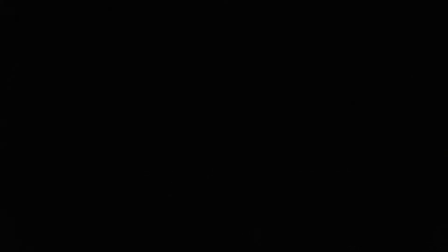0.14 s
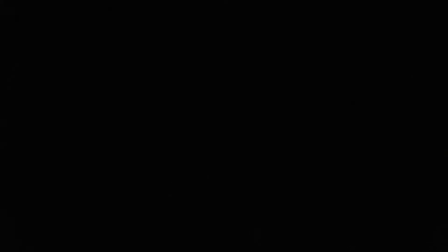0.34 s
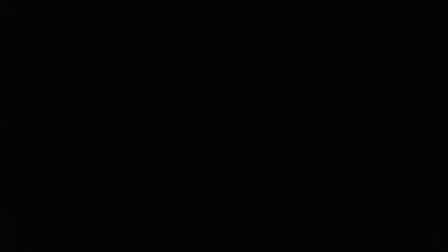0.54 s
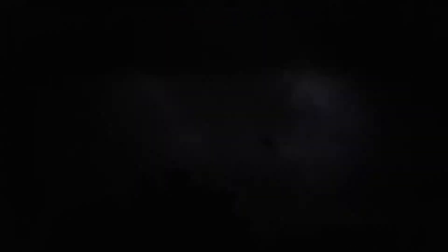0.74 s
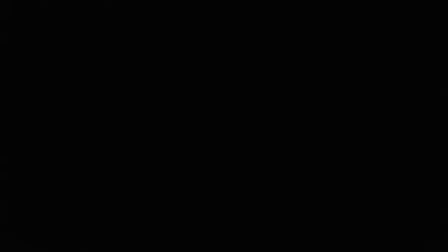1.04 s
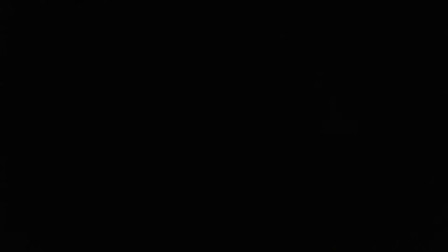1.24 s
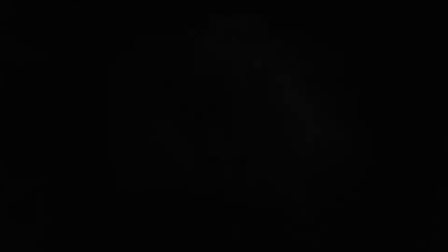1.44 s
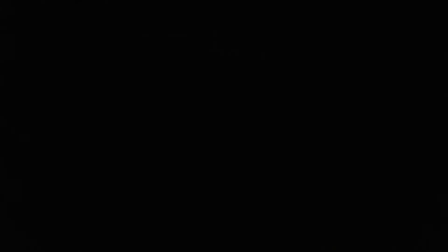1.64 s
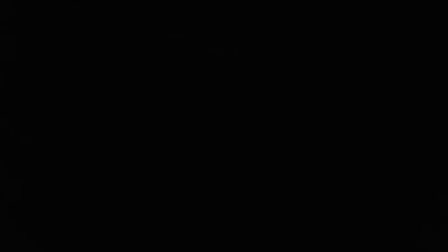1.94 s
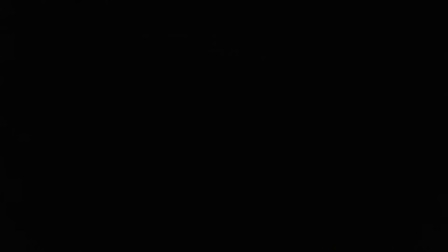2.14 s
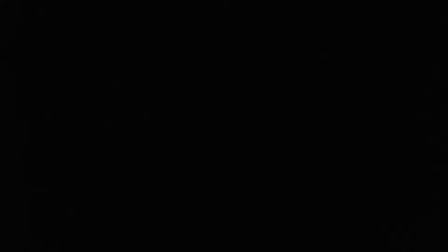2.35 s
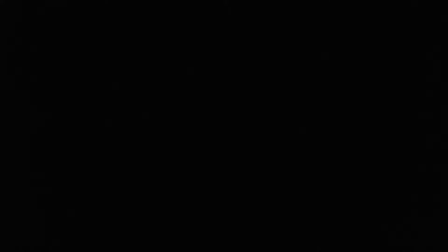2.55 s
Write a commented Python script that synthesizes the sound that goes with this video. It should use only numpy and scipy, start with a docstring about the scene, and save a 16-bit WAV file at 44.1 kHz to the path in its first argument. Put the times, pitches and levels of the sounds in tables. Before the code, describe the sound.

Distant thunder rolls on without a break, swelling into dull thumps over the thin hiss of light rain. Outdoors at night, a drop knocks on something hollow, then another ticks sharply right beside the left microphone.

```python
"""Outdoors in a night storm, far thunder rolls over the thin hiss of light rain. Many dull arrivals
superpose into the roll, and a few strong ones stand out as thumps. Drops tick on a casing beside the
left microphone, one excites the modes of something hollow and one plinks into water, amid short soft
bursts of noise. A faint swish and a rising whistle follow the knock; a higher whistle sinks at the end."""
import sys
import numpy as np
from scipy import signal
from scipy.fft import rfft, irfft
from scipy.io import wavfile
from scipy.ndimage import uniform_filter1d

SR = 44100
rng = np.random.default_rng(int(sys.argv[2]) if len(sys.argv) > 2 else 0)


def generate_wav(sig):
    """Save sig (samples, or channels by samples) to the path in sys.argv[1] as 16-bit PCM at SR."""
    pcm = np.round(np.clip(np.atleast_2d(sig).T, -1, 1) * 32767).astype(np.int16)
    wavfile.write(sys.argv[1], SR, pcm)


N = 119070
LOW_CUT_HZ, TOP_HZ = 40, 15900  # passband of the recorder


def thunder():
    """Superposition: a deep roll with a growl above it; a few strong arrivals stand out as thumps."""
    # spectra of the roll and its growl (f/Hz, relative density/dB)
    roll_spectrum = [(20, -32), (31, -39.5), (43, -6), (56, -6.5), (67, -12), (78, -16.5), (90, -6),
                     (112, -4), (127, -6), (155, -1.5), (178, -2), (192, -3), (208, 0), (235, -15.5),
                     (290, -21.5), (600, -75.5)]
    growl_spectrum = [(120, -20), (200, -23), (243, 4), (265, -6), (305, 1), (340, -2.5), (380, -2.5),
                      (425, -8.5), (460, -6.5), (490, -11), (560, -14), (750, -20.5), (1100, -34),
                      (2500, -64.5)]
    # their envelopes (t/s, level/dB)
    roll_levels = [(0, -36.5), (.2, -34.5), (.33, -38), (.42, -33.5), (.55, -31), (.72, -33.5), (.87, -34),
                   (1.12, -34), (1.27, -35.5), (1.4, -32), (1.6, -33), (1.8, -33.5), (1.98, -30),
                   (2.2, -37.5), (2.4, -32.5), (2.7, -34)]
    growl_levels = [(0, -38), (.15, -38.5), (.28, -40.5), (.5, -38.5), (.7, -38), (.85, -38), (1.15, -41),
                    (1.3, -40.5), (1.55, -39.5), (1.78, -39.5), (2.0, -39), (2.2, -41.5), (2.45, -41),
                    (2.7, -41.5)]
    # strong arrivals (t/s, f/Hz, peak level/dB, rise time/s)
    arrivals = [(.015, 315.5, -33, 0.015), (.085, 110, -32, .014), (.095, 325.4, -32, 0.012),
                (.39, 176, -28.5, 0.015), (.395, 307.5, -34, 0.011), (.495, 316, -32, 0.016),
                (.51, 208.5, -31.5, 0.016), (.565, 160.1, -31.5, 0.02), (0.796, 161.2, -25, 0.021),
                (1.006, 168.4, -21, 0.016), (1.016, 289.4, -30, 0.015), (1.304, 167, -15.5, 0.011),
                (1.305, 121.6, -23, 0.023), (1.307, 80, -32.5, 0.023), (1.47, 57, -34.5, 0.04),
                (1.595, 203, -27.5, 0.012), (1.652, 147, -27.5, 0.0076), (1.737, 176.4, -24.5, 0.015),
                (1.829, 206, -29.5, .012), (1.89, 148.6, -26, 0.019), (1.897, 79, -32, 0.02),
                (2.015, 177.5, -30.5, 0.012), (2.335, 152, -23, 0.02)]
    roll = rumble(roll_spectrum, roll_levels) + rumble(growl_spectrum, growl_levels)
    grit = undb(-24.5) * unit(colour(rng.standard_normal(N), growl_spectrum))
    thumps = sum(undb(db) * swell(s, rise) * (tone(s, hz) + grit) for s, hz, db, rise in arrivals)
    return pan(roll + thumps, db=.4)


def rumble(spectrum, levels, even_s=.09):
    """Incoherent addition: many dull arrivals merge into one even sound, wider towards the top."""
    # stereo width (f/Hz, gain of the side signal/dB)
    width = [(50, -21.5), (160, -22), (350, -16), (700, -10), (1200, 6)]
    mid = unit(colour(scatter(per_s=1800, spread_db=1), spectrum))
    running_rms = np.sqrt(uniform_filter1d(mid ** 2, int(even_s * SR)) + 1e-9)
    mid = unit(mid / running_rms)
    side = colour(unit(colour(rng.standard_normal(N), spectrum)), width)
    return curve(levels) * (mid + side * np.array([[1], [-1]]))


def ticks():
    """Impact excitation: sharp clicks close on the left. A brief faint hiss is added separately."""
    # impacts (t/s, peak level/dB, treble tilt/dB, low edge f/Hz)
    impacts = [(0.9904, -41, -26, 5000), (1.0432, -22, -22, 2600), (1.048, -33, -32, 2400),
               (1.0512, -23.5, -21, 2200), (1.057, -11, -2.5, 400)]
    clicks = sum(undb(db) * casing_click(s, tilt_db, low_hz) for s, db, tilt_db, low_hz in impacts)
    hiss_envelope = sum(undb(db - 37.5) * fade(s, decay_s=.025) for s, db, _, _ in impacts)
    added_hiss = hiss_envelope * band(hz=5760, octaves=.76)
    return pan(clicks + added_hiss, db=27)


def casing_click(start, tilt_db, low_hz, spread_s=.00082):
    """Dispersion: the highs leave the struck casing before the lows, coloured by its resonances; peak 1."""
    # broad resonances of the casing (f/Hz, relative level/dB)
    resonances = [(200, -16), (500, -0.5), (800, -1), (1400, 1), (2700, -8), (3600, -5.5), (4500, 2),
                  (5100, -6), (5600, -12), (6600, -12.5), (7400, -3), (8300, 3), (9500, 1), (10400, -16),
                  (11900, -4), (13600, -12), (14600, -11), (16000, -30)]
    hz = np.fft.rfftfreq(N, 1 / SR)
    group_delay = start + spread_s * (1 - hz / TOP_HZ)
    phase = -2 * np.pi * np.cumsum(group_delay) * SR / N
    gain = undb(tilt_db * hz / TOP_HZ) * hz ** 2 / np.hypot(hz ** 2, low_hz ** 2)
    click = colour(irfft(gain * np.exp(1j * phase), N), resonances)
    return click / np.abs(click).max()


def knocks(contact_s=.00045):
    """Damped modes: a drop pushes something hollow over a short contact time, and spatters."""
    # impacts (t/s, peak level/dB)
    impacts = [(0.3208, -27.5), (.3262, -39), (.3332, -34), (.339, -53), (.3452, -45)]
    # modes of the hollow body (f/Hz, relative level/dB, T60/s)
    modes = [(703, 2, 0.062), (816, 3.5, 0.041), (983, 4.5, 0.027), (1180, 7, 0.033), (1340, 3.5, 0.038),
             (1520, 2.5, 0.011), (2060, 9, 0.0092), (2160, -2, 0.013), (2480, -10, 0.013)]
    spatter = undb(-24) * band(hz=1350, octaves=.71)
    out = 0
    for s, db in impacts:
        t = since(s)
        ring = sum(undb(mode_db - 60 * t / t60) * tone(s, hz) for hz, mode_db, t60 in modes)
        ring *= 1 - np.exp(-(t / contact_s) ** 2)
        out += undb(db) * (ring / np.abs(ring).max() + spatter * fade(s, decay_s=.016))
    return pan(out, db=-1.5)


def plink():
    """Damped oscillation: a drop falling into water sounds one brief tone."""
    # the drop (t/s, f/Hz, peak level/dB, rise time/s)
    drops = [(0.682, 1203, -43, 0.0021)]
    return sum(undb(db) * swell(s, rise) * tone(s, hz) for s, hz, db, rise in drops)


def soft_bursts(rise_s=.003):
    """Exponential decay: short soft bursts of noise, and a faint longer swish after the knock."""
    # bursts (t/s, level/dB, centre f/Hz, decay time/s, pan/dB)
    bursts = [(.163, -54, 4480, .018, 13), (.262, -64.5, 11000, .015, 0), (.405, -52.5, 1800, 0.087, -3),
              (.652, -51.5, 4600, 0.013, 10), (.955, -58, 3660, 0.13, 13), (1.184, -57.5, 6400, 0.043, -2),
              (1.206, -44, 2360, 0.0085, -1), (1.21, -48.5, 980, 0.048, -3), (1.255, -50, 1650, 0.041, -8),
              (1.257, -54, 7600, 0.0059, 1), (1.568, -58, 6660, 0.016, -3),
              (2.045, -52.5, 3500, 0.0086, -4), (2.105, -60, 5500, 0.041, 0),
              (2.485, -53.5, 5000, .008, -2), (2.523, -51, 8500, 0.0047, 4), (2.618, -53, 4000, 0.0054, 0)]
    out = 0
    for s, db, hz, decay, pan_db in bursts:
        noise = np.array([band(hz, octaves=.55) for _ in range(2)])
        envelope = (1 - np.exp(-since(s) / rise_s)) * fade(s, decay)
        out += pan(undb(db) * envelope * noise, pan_db)
    return out


def rain(coherence=.056, flicker_db=1.32):
    """Incoherent addition: countless far drops make a wide, slightly flickering hiss."""
    # spectrum of the hiss (f/Hz, relative density/dB)
    spectrum = [(300, -18.5), (700, 3.5), (1100, 1.5), (1700, 2.5), (2400, 1.5), (3300, -7), (5000, -9.5),
                (6800, -14), (8300, -13.5), (10000, -21), (15500, -22)]
    # strength of the rain (t/s, level/dB)
    levels = [(0, -56), (.25, -58.5), (.35, -56), (.42, -53.5), (.52, -53.5), (.8, -57.5), (1.3, -56.5),
              (1.6, -58.5), (2.1, -56), (2.35, -57), (2.55, -54.5), (2.7, -57)]
    separate = np.sqrt(1 - coherence) * rng.standard_normal((2, N))
    common = np.sqrt(coherence) * rng.standard_normal(N)
    return unit(colour(separate + common, spectrum)) * curve(levels) * undb(flicker_db * walk(per_s=17))


def patter(decay_s=.0023):
    """Shot noise: single faint drops land at random, each a short spray."""
    drops = scatter(per_s=220, spread_db=5)
    spray = np.array([band(hz=4500, octaves=.9) for _ in range(2)]) * np.exp(-since(0) / decay_s)
    return undb(-75.5) * unit(signal.fftconvolve(drops[None], spray, axes=1)[:, :N])


def whistles():
    """Modulation broadens a tone: the rising whistle wavers more and is airy, the sinking one purer."""
    # paths of the two whistles (t/s, f/Hz, level/dB)
    rising = [(.33, 3200, -74), (.355, 3450, -68), (.38, 3750, -66), (.41, 3900, -71), (.46, 3950, -80)]
    sinking = [(2.44, 9550, -87), (2.48, 9350, -76), (2.54, 8600, -83), (2.6, 8250, -77), (2.7, 7950, -73)]
    return glide(rising, waver=.045) + glide(sinking, waver=.011)


def glide(path, waver, flicker_db=3):
    """Random frequency and amplitude modulation of a thin, sliding tone."""
    s, hz, db = np.array(path).T
    t = since(0)
    pitch = np.interp(t, s, hz) * (1 + waver * walk(per_s=600))
    gain = undb(np.interp(t, s, db) + flicker_db * walk(per_s=61))
    return (t > s[0]) * (t < s[-1]) * gain * np.sin(2 * np.pi * np.cumsum(pitch) / SR)


def undb(db):
    """Decibels to amplitude ratio."""
    return 10 ** (np.asarray(db) / 20)


def unit(x):
    """Normalisation to rms 1."""
    return x / np.sqrt(np.mean(x ** 2) + 1e-20)


def since(start):
    """Seconds since a moment, zero before it."""
    return np.maximum(np.arange(N) / SR - start, 0)


def tone(start, hz):
    """Simple harmonic motion from a given moment."""
    return np.sin(2 * np.pi * hz * since(start))


def swell(start, rise_s):
    """Critically damped envelope: it reaches 1 after its rise time and falls away."""
    u = since(start) / rise_s
    return u * np.exp(1 - u)


def fade(start, decay_s):
    """Exponential decay after a jump to 1."""
    return (since(start) > 0) * np.exp(-since(start) / decay_s)


def curve(rows):
    """Envelope through (t/s, level/dB) points."""
    return undb(np.interp(since(0), *np.array(rows).T))


def log_freqs():
    """Octave position of every spectrum bin."""
    return np.log2(np.maximum(np.fft.rfftfreq(N, 1 / SR), 1))


def colour(x, rows):
    """Zero-phase filtering by (f/Hz, gain/dB) points."""
    hz, db = np.array(rows).T
    return irfft(rfft(x) * undb(np.interp(log_freqs(), np.log2(hz), db)), N)


def band(hz, octaves):
    """Band-limited noise with soft edges, rms 1."""
    offset = (log_freqs() - np.log2(hz)) / octaves
    return unit(irfft(rfft(rng.standard_normal(N)) / (1 + offset ** 4), N))


def pan(x, db):
    """Level difference: the far channel is weakened; positive is left."""
    return x * undb([[min(db, 0)], [min(-db, 0)]])


def walk(per_s):
    """Smoothed random fluctuation, rms 1."""
    hold = int(SR / per_s)
    steps = np.repeat(rng.standard_normal(N // hold + 1), hold)
    return unit(uniform_filter1d(uniform_filter1d(steps, hold), hold)[:N])


def scatter(per_s, spread_db):
    """Poisson impulses of random size and sign."""
    hit = rng.random(N) < per_s / SR
    return hit * np.sign(rng.standard_normal(N)) * undb(spread_db * rng.standard_normal(N))


def scene():
    """Linear superposition of thunder, far and near rain, soft bursts and whistles."""
    return thunder() + rain() + patter() + soft_bursts() + ticks() + knocks() + plink() + whistles()


def record(dry):
    """Band limiting: the recorder cuts the deepest bass and the top."""
    high_pass = signal.butter(4, LOW_CUT_HZ, "high", fs=SR, output="sos")
    low_pass = signal.ellip(10, .2, 80, TOP_HZ, fs=SR, output="sos")
    return signal.sosfilt(low_pass, signal.sosfiltfilt(high_pass, dry))


dry = scene()
out = record(dry)
generate_wav(out)
```